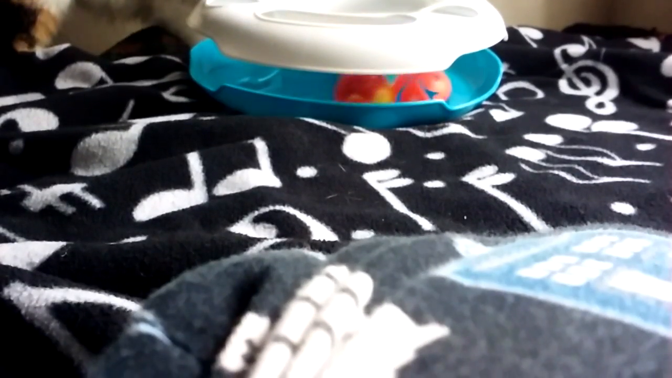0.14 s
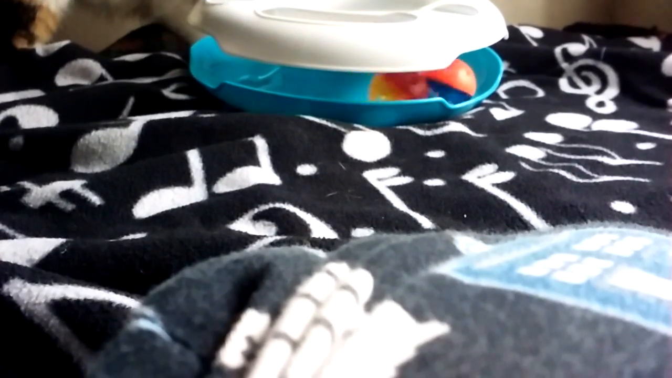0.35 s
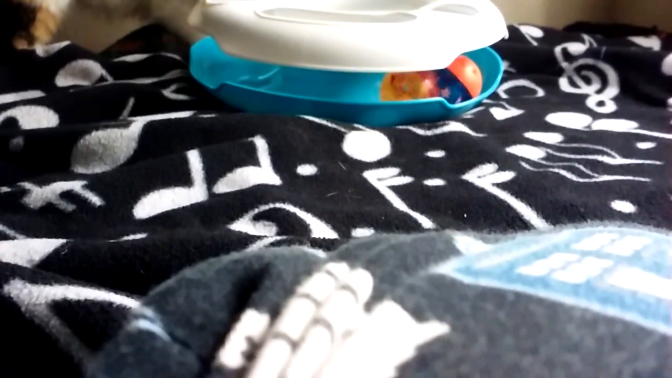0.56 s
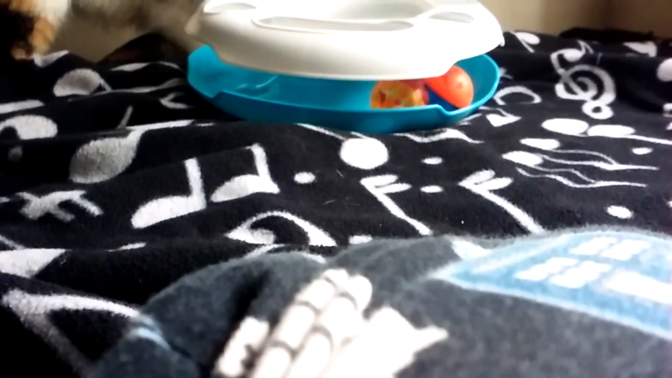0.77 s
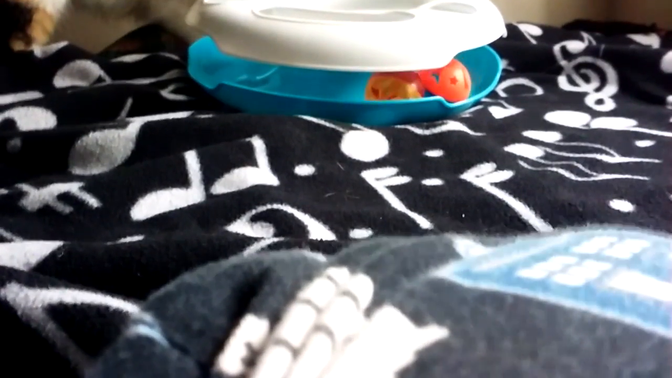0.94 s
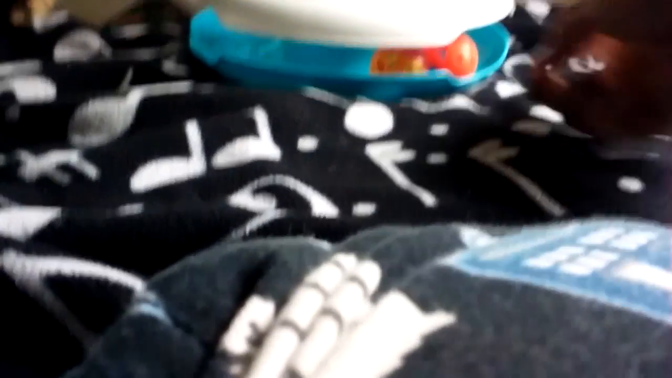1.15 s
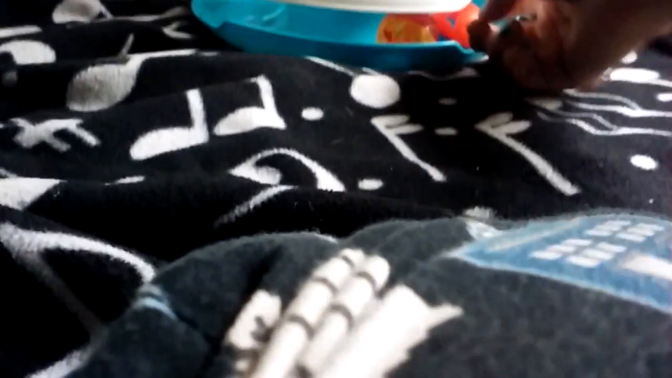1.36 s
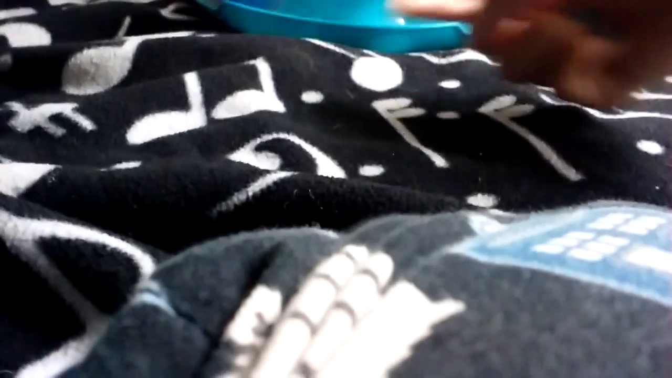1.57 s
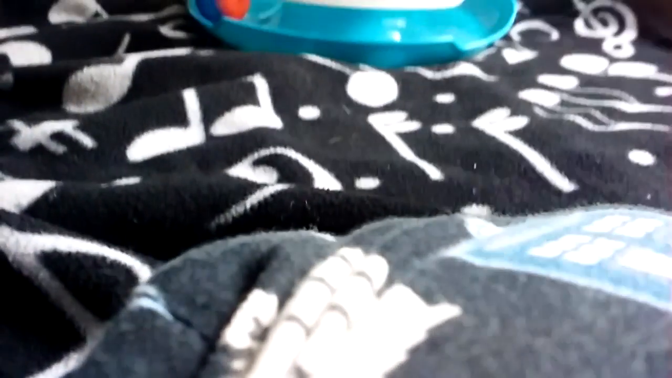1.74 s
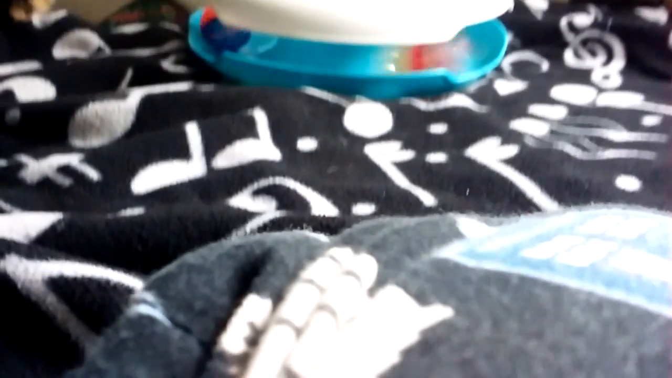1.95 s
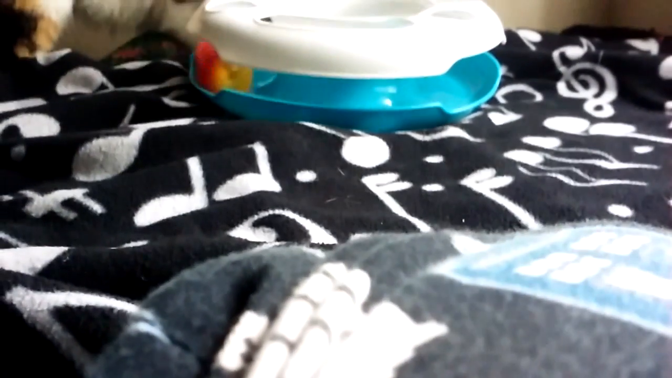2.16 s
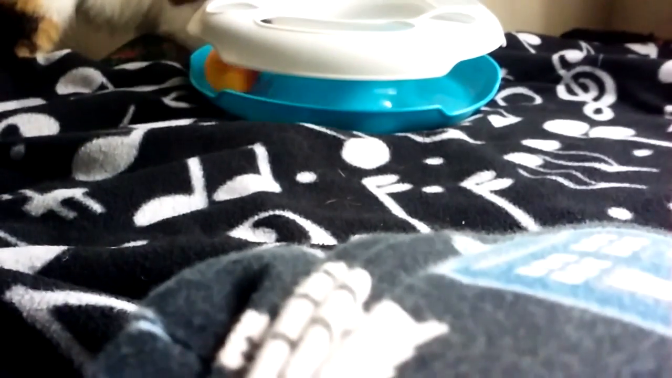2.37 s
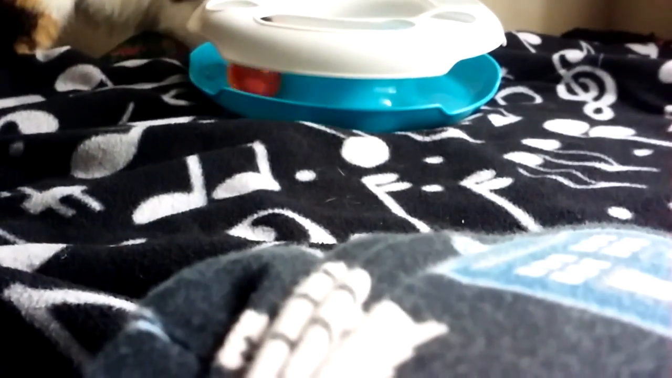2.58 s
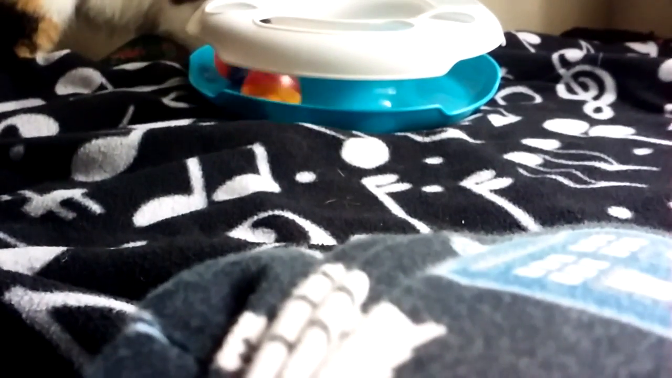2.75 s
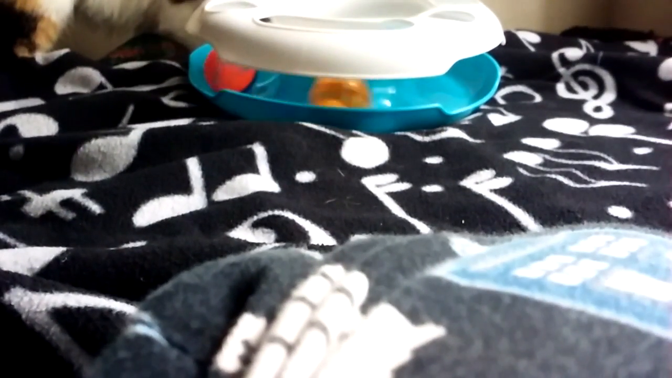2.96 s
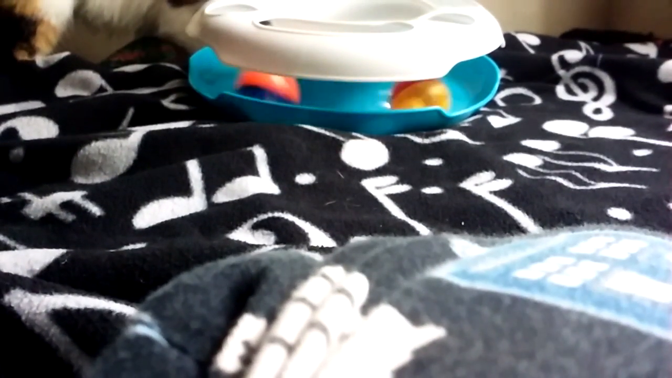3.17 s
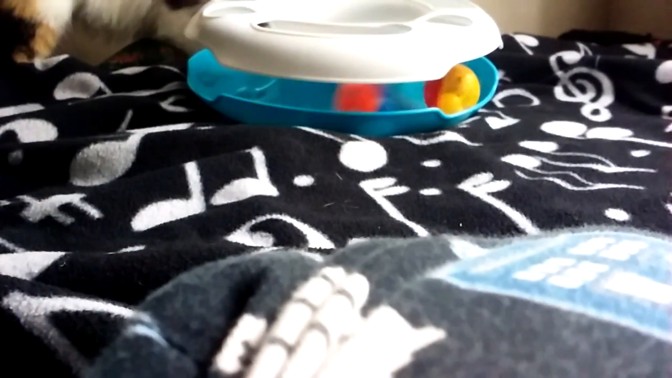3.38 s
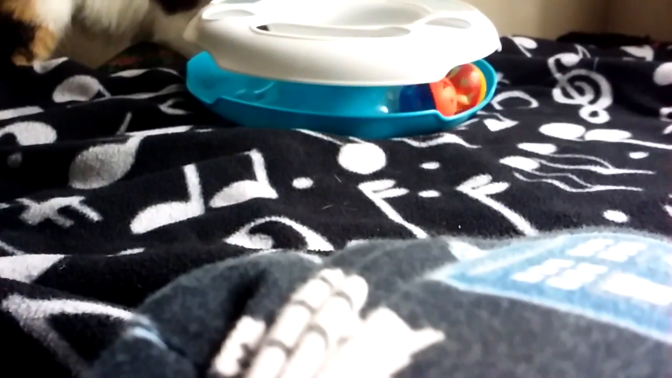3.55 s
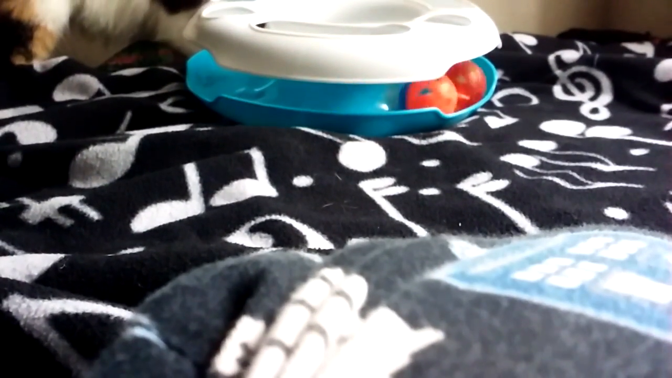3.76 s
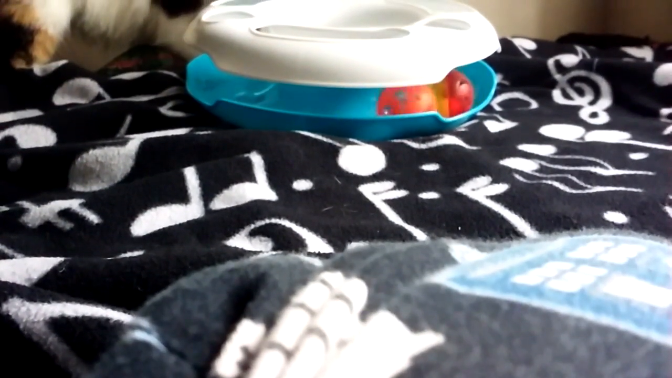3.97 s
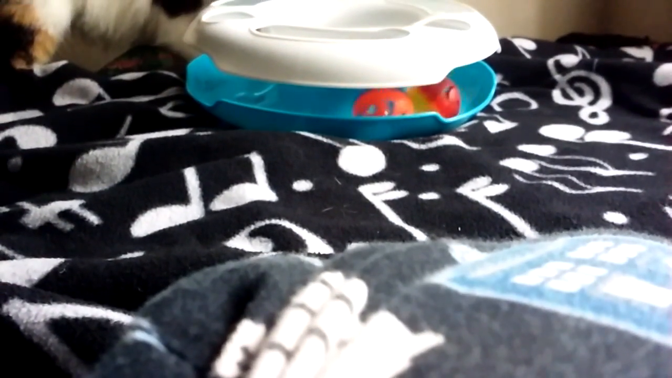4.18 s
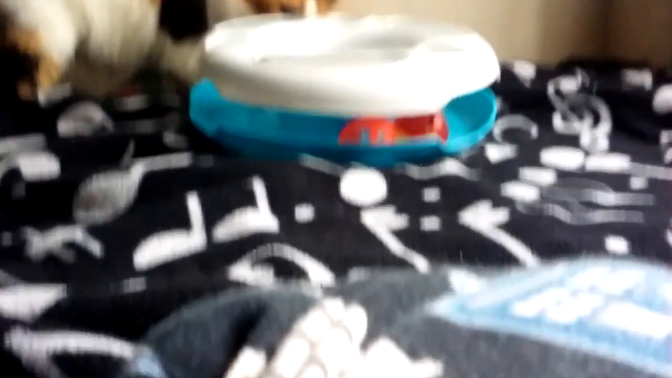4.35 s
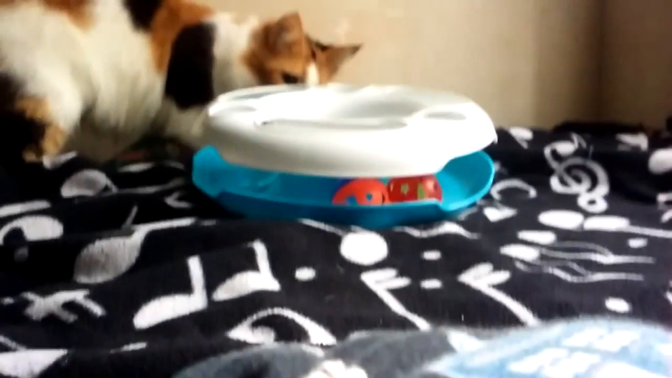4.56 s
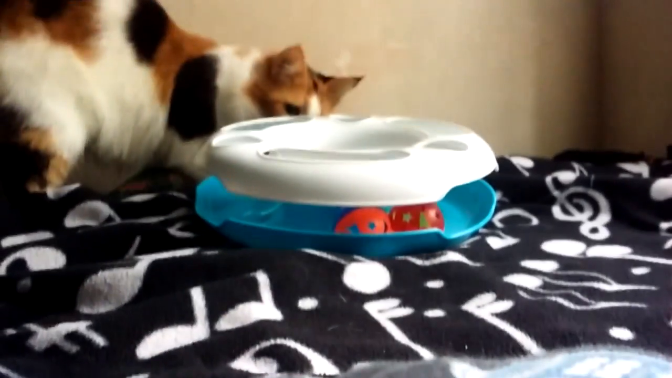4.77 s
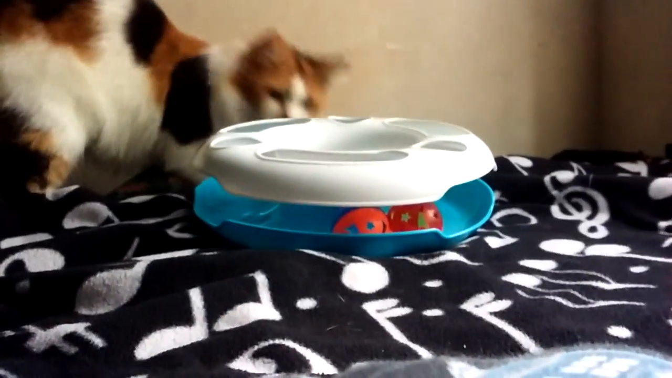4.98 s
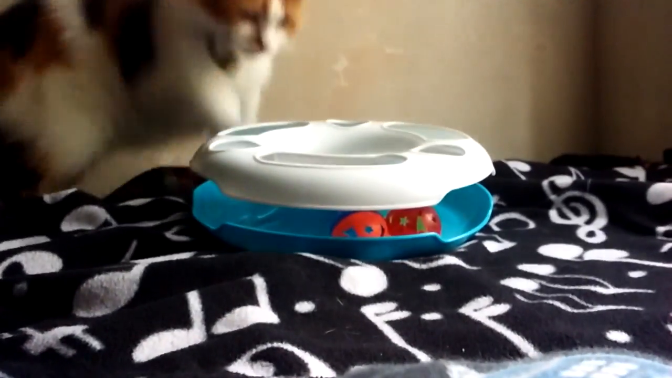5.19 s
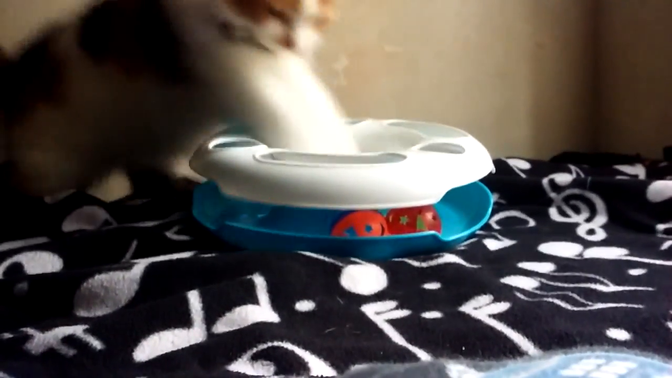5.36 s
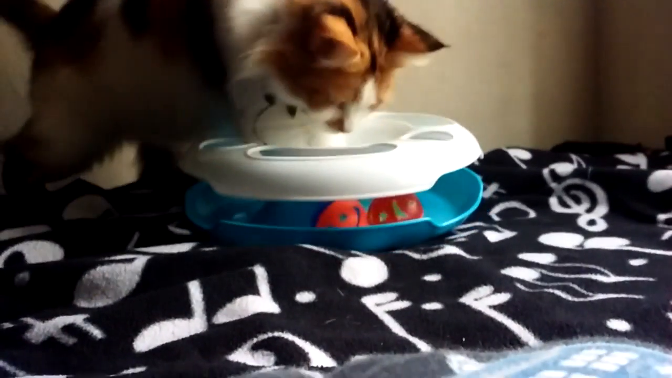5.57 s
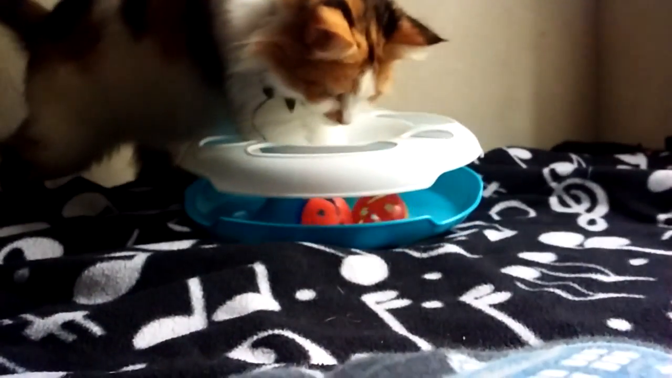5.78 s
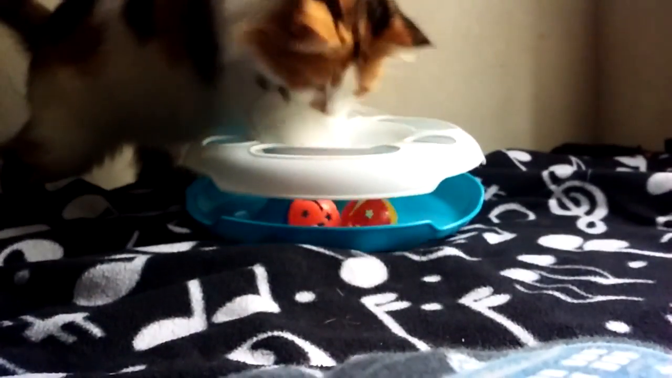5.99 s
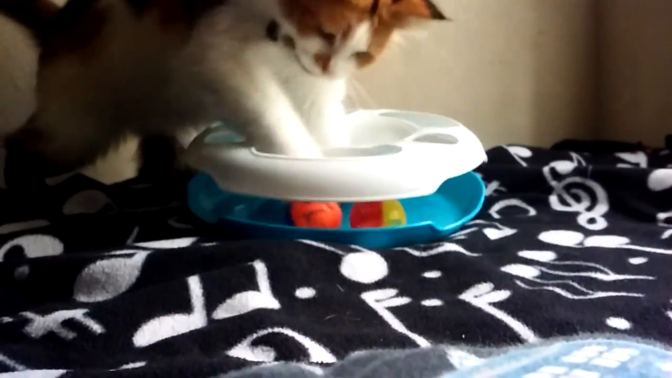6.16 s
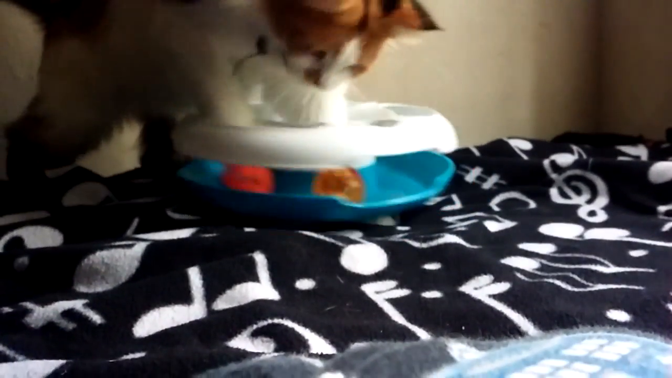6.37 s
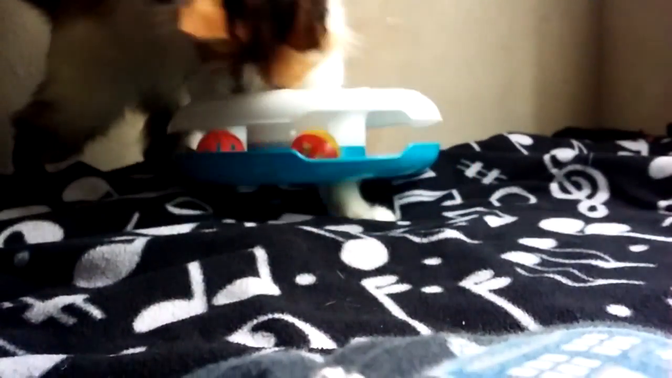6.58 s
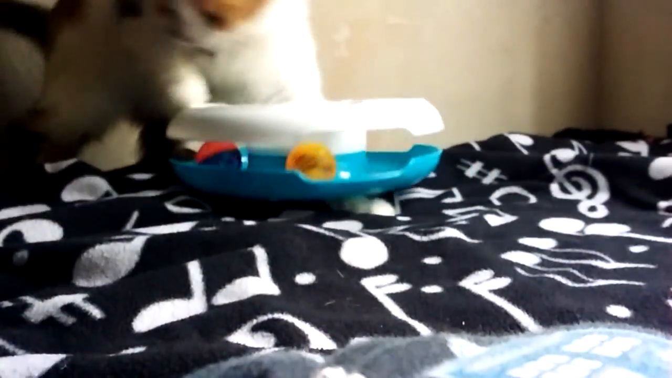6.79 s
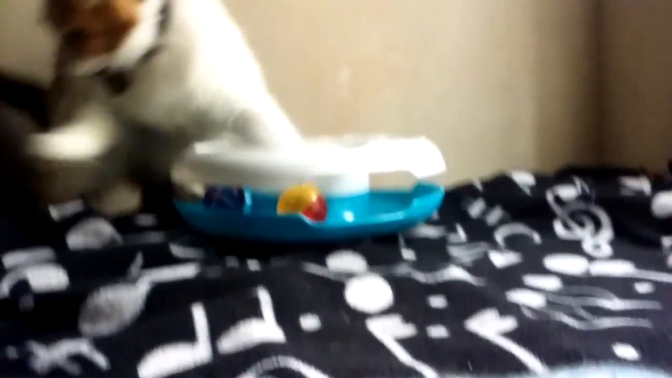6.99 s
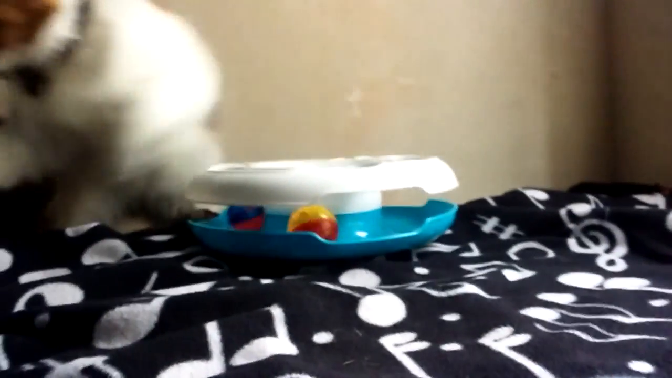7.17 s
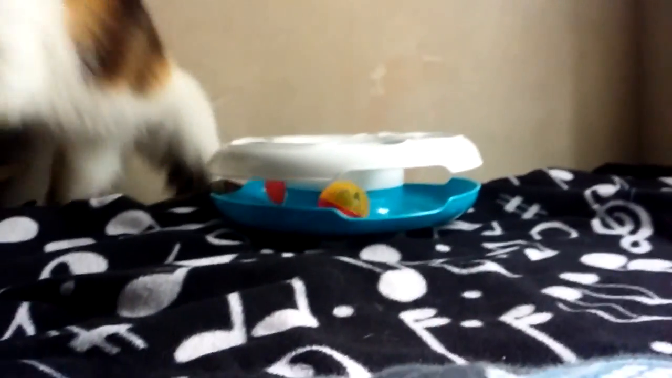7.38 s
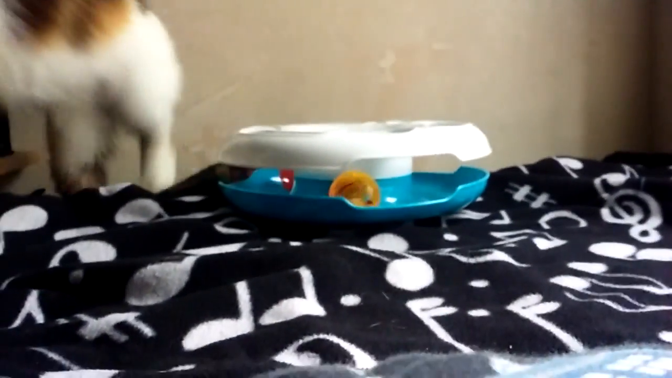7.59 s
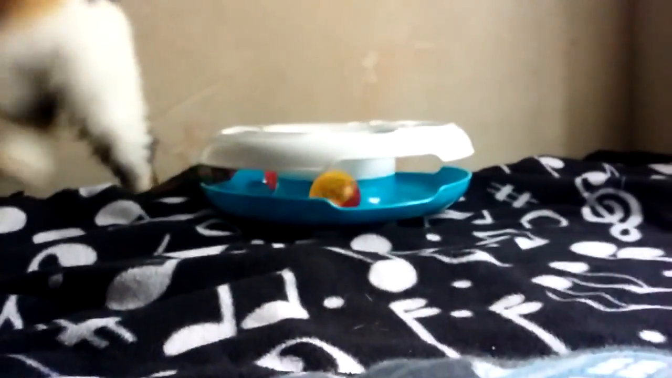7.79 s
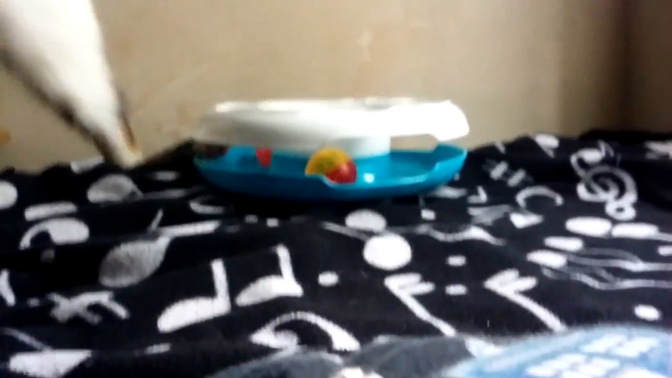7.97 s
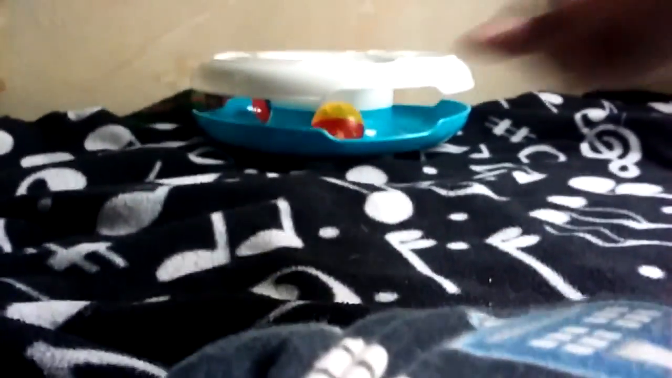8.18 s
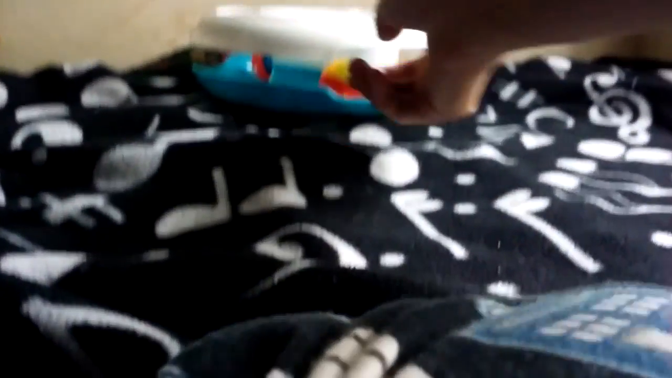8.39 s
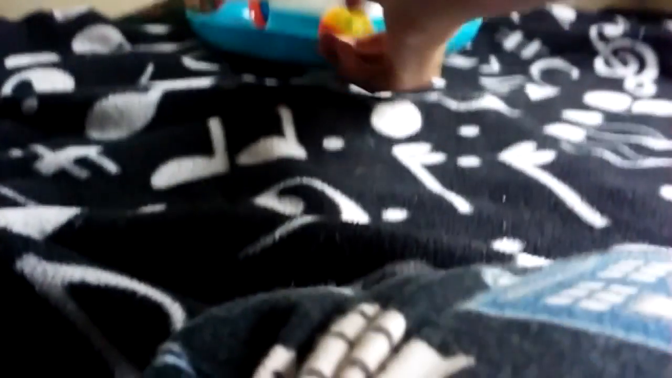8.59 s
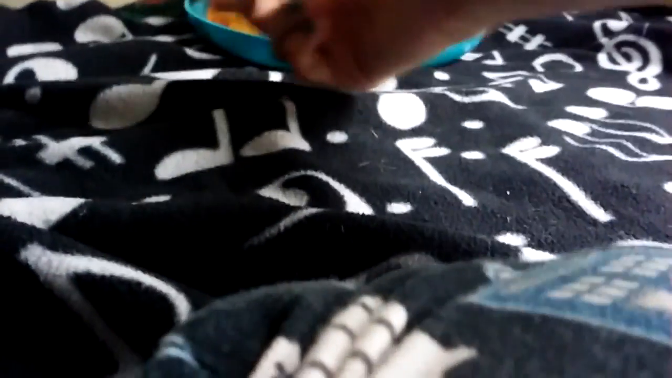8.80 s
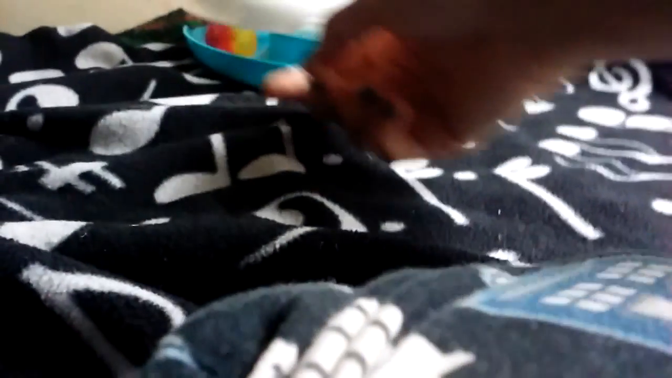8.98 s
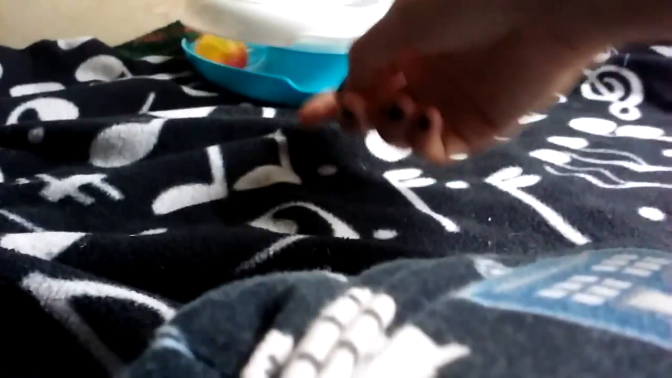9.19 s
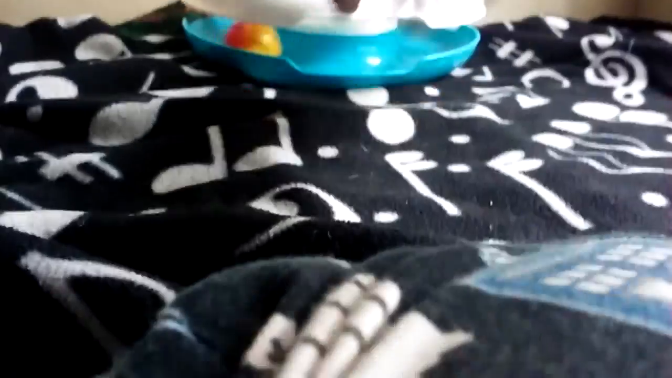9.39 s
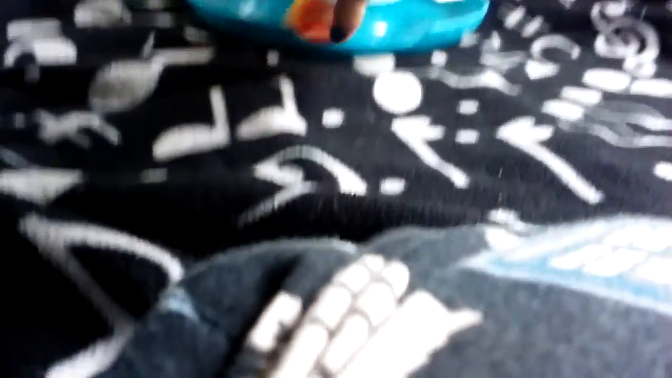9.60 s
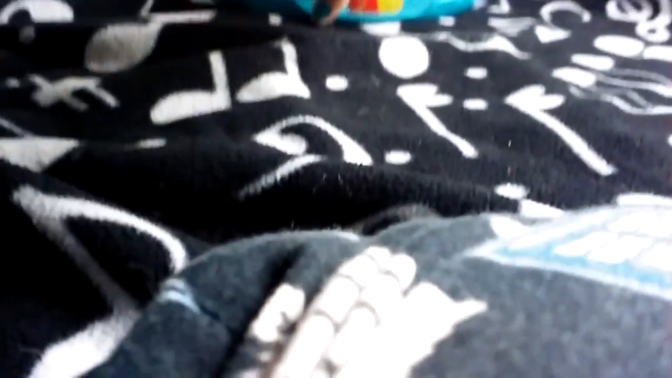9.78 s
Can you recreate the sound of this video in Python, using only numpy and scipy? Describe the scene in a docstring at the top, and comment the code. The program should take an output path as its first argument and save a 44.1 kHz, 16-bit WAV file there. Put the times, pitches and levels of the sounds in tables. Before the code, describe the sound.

Two plastic balls with tinny bells inside jingle and rattle in short bursts around a hollow plastic track, knocking sharply, over a faint pulsing whir.

```python
"""A clack and a jingle open the scene: two plastic balls with bells inside roll round a cat toy's ring track.
A hand and a paw push them, on a bed: pellets strike the bells and scuff the shells (decaying modes and noise
bursts), the balls clack together, knock and patter on the hollow track; the blanket gives soft thumps of noise.
Behind them, in the small room, some appliance whirs about once a second (resonant noise) over a low hum (sines)."""
import sys
import numpy as np
from scipy import signal
from scipy.fft import rfft, irfft, next_fast_len
from scipy.io import wavfile
from scipy.ndimage import uniform_filter1d, map_coordinates

SR = 44100
rng = np.random.default_rng(int(sys.argv[2]) if len(sys.argv) > 2 else 0)


def int16_out(signal):
    """Quantize to a 16-bit WAV file."""
    q = np.round(np.clip(np.atleast_2d(signal).T, -1, 1) * 32767)
    wavfile.write(sys.argv[1], SR, q.astype(np.int16))


N = 433944


def amp(db):
    """Decibels to gain."""
    return 10 ** (np.asarray(db) / 20)


def unit(x):
    """x at rms 1."""
    return x / np.sqrt(np.mean(x ** 2) + 1e-20)


def along(points, hz):
    """(Hz, value) points read on a log frequency axis."""
    f, v = np.transpose(points)
    return np.interp(np.log(hz + 1), np.log(f + 1), v)


def clock():
    """Time of every sample in seconds."""
    return np.arange(N) / SR


def wobble(rate_hz):
    """Smooth random curve, rate_hz knots a second."""
    knots = rng.standard_normal(int(N * rate_hz / SR) + 4)
    return map_coordinates(knots, [clock() * rate_hz])


def filtered(x, response):
    """x times a response of frequency."""
    m = next_fast_len(N + SR // 2)
    hz = np.fft.rfftfreq(m, 1 / SR)
    return irfft(rfft(x, m) * response(hz), m)[:N]


def noise(spectrum):
    """Noise of rms 1 with the given colour."""
    return unit(filtered(rng.standard_normal(N), lambda hz: amp(along(spectrum, hz))))


def pulses(times_s, sizes):
    """One impulse for each contact."""
    return np.bincount(np.clip(times_s * SR, 0, N - 1).astype(int), sizes, N)


def ring(times_s, sizes, modes, scatter_db, detune, contact_s, colour_db=0):
    """Contacts ring the modes; each lands on another spot, which shares out its force and bends the pitches anew."""
    t = np.arange(SR // 18, dtype=np.float32) / SR
    hz, db, t60 = np.transpose(modes)
    draws = rng.standard_normal((len(times_s), 3, len(modes)))
    force, bend, turn = draws.transpose(1, 0, 2)
    shares = amp(db + colour_db + scatter_db * force)
    shares = np.float32(shares / np.linalg.norm(shares, axis=1, keepdims=True))
    speed = np.float32(2 * np.pi * hz * (1 + detune * bend))
    phase = np.float32(2 * np.pi * turn)
    decay = np.float32(amp(-60 * t / t60[:, None]))
    waves = 0
    for k in range(len(modes)):
        waves = waves + shares[:, [k]] * np.sin(speed[:, [k]] * t + phase[:, [k]]) * decay[k]
    swell = 1 - np.exp(-(t / contact_s) ** 2)  # the ring builds up while the contact lasts
    where = (times_s * SR).astype(int)[:, None] + np.arange(len(t))
    return np.bincount(where.ravel(), (sizes[:, None] * swell * waves).ravel(), N)[:N]


# Dry click of a contact. Each row: frequency in Hz, relative spectral level in dB.
CLICK_SPECTRUM = [(100, -58.5), (900, -28), (2600, -13), (3800, -6.5), (4900, -2.5), (6800, -2.5),
                  (8500, -10), (11000, -19.5), (14000, -19.5), (16000, -30)]


def clicks(times_s, sizes, t60_s, colour=CLICK_SPECTRUM, treble_scatter_db=4):
    """Short burst of noise at each contact; how much top it has varies as the balls turn."""
    t = np.arange(SR // 8) / SR
    decay = amp(-60 * t / t60_s) * (1 - np.exp(-t / .0006))
    envelope = signal.oaconvolve(pulses(times_s, sizes), decay)[:N]
    bursts = rng.standard_normal(N) * envelope

    def top_share(hz):
        return np.clip((hz - 9500) / 3000, 0, 1)

    low = filtered(bursts, lambda hz: amp(along(colour, hz)) * (1 - top_share(hz)))
    high = filtered(bursts, lambda hz: amp(along(colour, hz)) * top_share(hz))
    return low + amp(treble_scatter_db * wobble(25)) * high


def chatter(rate_hz, spread_db):
    """Times and sizes of small contacts: one at a random moment in each slot, at a random level."""
    slots = np.arange(int(rate_hz * N / SR))
    draws = rng.random((len(slots), 2))
    return (slots + draws[:, 0]) / rate_hz, amp(-spread_db * draws[:, 1])


def turning(times_s, modes):
    """As a ball turns, successive contacts favour other modes: a slow random weight for each."""
    weights = rng.standard_normal((len(times_s), len(modes)))
    return unit(uniform_filter1d(weights, size=7, axis=0))


# Appliance resonances. Each row: frequency in Hz, half-width at half amplitude in Hz, relative level in dB.
WHIR_RESONANCES = [(353.7, 17.5, 0.5), (706, 13, -12.5), (878.4, 11, 0), (947, 57, -15)]
# Its rush of air. Each row: frequency in Hz, relative spectral level in dB.
AIR_SPECTRUM = [(60, -23), (150, -2), (280, 2.5), (450, -2), (620, -2.5), (1000, -7), (1300, -23),
                (2500, -29.5), (6000, -41), (15000, -45.5)]


def appliance(flutter_hz=46, period_s=.961, first_s=.53):
    """Each slow stroke draws air and sets a fluttering whir going for about half the cycle."""
    t = clock()
    stroke = np.cos(2 * np.pi * (t - first_s) / period_s)
    running = np.clip(.5 + 3.0 * stroke, 0, 1)

    def body(f):
        return sum(amp(db) / (1 + ((f - hz) / width) ** 2) for hz, width, db in WHIR_RESONANCES)

    whir = unit(filtered(rng.standard_normal(N), body))
    flutter = 1 + 0.39 * np.sin(2 * np.pi * flutter_hz * t + 2 * wobble(9))
    air = amp(-63.0 + 0.84 * stroke + wobble(2.3)) * noise(AIR_SPECTRUM)
    return amp(-57.5) * running * flutter * whir + air


# Still room air. Each row: frequency in Hz, relative spectral level in dB.
STILL_SPECTRUM = [(20, -29.5), (40, -18), (60, -14), (90, -10.5), (170, -9), (300, 5.5), (600, -15),
                  (1200, -17.5), (3000, -21), (8000, -24), (15500, -23)]
# Hum partials. Each row: frequency in Hz, rms level in dB about which it wavers.
HUM_PARTIALS = [(59.5, -83), (119.5, -73.5), (177, -71.5)]


def background():
    """Appliance, wavering hum sines and room air with an uneven rumble; their level dips briefly twice."""
    t = clock()
    hum = np.zeros(N)
    for hz, db in HUM_PARTIALS:
        level = amp(db + wobble(4)) * np.sqrt(2)
        hum += level * np.sin(2 * np.pi * hz * t + .5 * wobble(1.6))
    rumble_spectrum = [(20, -12.5), (45, -8), (60, 5), (85, -13), (160, -15.5), (1000, -72.5)]
    rumble = amp(-75.5 + 3.5 * wobble(3.9)) * noise(rumble_spectrum)
    still = amp(-69) * noise(STILL_SPECTRUM)
    dip_times_s = [.84, .94, 1.12, 1.22, 4.72, 4.79, 4.98, 5.08]
    dips_db = np.interp(t, dip_times_s, [0.0, -16.5, -11.5, -2.0, 0, -10.5, -8.5, -0.5])
    return amp(dips_db) * (appliance() + hum + rumble + still)


# Room decay. Each row: frequency in Hz, t60 in seconds.
ROOM_DECAY = [(200, 0.17), (1000, 0.11), (5000, 0.14), (14000, 0.14)]


def room(x):
    """The walls' answer: a noise tail, each frequency dying at its own speed."""
    hz, t, z = signal.stft(rng.standard_normal(SR // 2), SR, nperseg=256)
    decay = amp(-60 * t / along(ROOM_DECAY, hz)[:, None])
    tail = signal.istft(z * decay, SR, nperseg=256)[1]
    tail = np.pad(tail / np.linalg.norm(tail), (SR // 250, 0))  # first echo after 4 ms
    return signal.oaconvolve(x, tail)[:N]


# Soft pushes into the bedding. Each row: centre in seconds, level in dB, Gaussian sigma in seconds, pitch in Hz.
THUMPS = [(1.415, -53, 0.045, 151), (5.298, -55, 0.03, 174), (5.407, -55, 0.038, 175),
          (7.484, -54, 0.023, 193), (9.406, -64, .03, 183)]


def bedding(focus_db=24):
    """Dull thumps as hand and paws press on the bed: swells of noise peaked at the pitch."""
    thumps = np.zeros(N)
    for centre_s, db, sigma_s, pitch in THUMPS:
        colour = [(pitch / 4, -2 * focus_db), (pitch / 2, -focus_db / 2), (pitch, 0),
                  (2 * pitch, -focus_db), (16 * pitch, -4 * focus_db)]
        swell = np.exp(-.5 * ((clock() - centre_s) / sigma_s) ** 2)
        thumps += amp(db) * swell * noise(colour)
    return thumps


# Runs of a ball, push to stop. Each row: start in seconds, length in seconds, jingle in dB before trim,
# track rumble in dB before trim, slowing in dB per second (negative: it gains).
RUNS = [(0.0, 0.29, -37, -57, 5.5), (0.338, 0.27, -41.5, -72, 22), (0.628, 0.2, -55.5, -75, 14),
        (1.575, 0.12, -29.5, -50, -58), (1.756, 0.33, -26, -41.5, 5.5), (2.099, 0.13, -37.5, -46.5, 54),
        (2.26, 0.15, -29, -48, 5), (2.43, 0.62, -48, -67, 21), (2.636, 0.078, -39.5, -69, 1),
        (2.897, 0.26, -36, -56.5, 19), (3.128, 0.22, -33.5, -50, 17), (3.374, 0.31, -36.5, -52, 4),
        (3.68, 0.2, -53, -76, 30), (3.82, 0.35, -59, -77, -2), (4.193, 0.3, -41, -66, 17),
        (4.477, 0.24, -46, -75, 52), (5.68, 0.052, -45.5, -84, 20), (5.815, 0.16, -40.5, -64, 88),
        (6.232, 0.19, -25, -44.5, 52), (6.514, 0.14, -37, -62, 11), (6.693, 0.025, -35.5, -80, 20),
        (6.797, 0.132, -36, -51, 5), (7.034, 0.059, -45.5, -80, 12), (7.263, 0.18, -50.5, -72, 12),
        (7.526, .07, -50.5, -77, 0), (7.655, 0.12, -44, -60, 42), (7.857, 0.18, -63, -84.5, 34),
        (8.418, 0.21, -61.5, -92, 70), (8.769, 0.19, -37.5, -54, 0), (8.934, 0.21, -46, -66, 19),
        (9.194, 0.21, -51.5, -71.5, 21), (9.418, 0.13, -44, -70.5, -27), (9.612, 0.34, -45.5, -67, 35)]
RUN_ATTACK_S, RUN_RELEASE_DB_PER_S = 0.011, 255.5  # getting under way; the pellets settling
LURCH_DB, LURCH_RATE_HZ = 3.5, 22  # a ball rolls unevenly


def rolling():
    """Strengths of jingle and track rumble: a pushed ball gets going, changes level steadily, then stops."""
    t = clock()
    jingle, rumble = np.zeros((2, N))
    for start, length, jingle_db, track_db, slowing in RUNS:
        span = (t > start) & (t < start + length + .5)
        age = t[span] - start
        slowing_db = slowing * np.minimum(age, length)
        release_db = RUN_RELEASE_DB_PER_S * np.maximum(age - length, 0)
        speed = np.minimum(age / RUN_ATTACK_S, 1) * amp(-slowing_db - release_db)
        jingle[span] += amp(jingle_db) * speed
        rumble[span] += amp(track_db) * speed
    lurch = amp(LURCH_DB * wobble(LURCH_RATE_HZ))
    return jingle * lurch, rumble * lurch


# Knocks of balls and paw on the plastic. Each row: time in seconds, level in dB before trim,
# pitch favoured by the spot in Hz.
KNOCKS = [(0.035, -29.5, 974), (0.168, -29, 1230), (1.651, -20.5, 1850), (1.709, -23.5, 1200),
          (1.834, -24.5, 1540), (1.921, -20.5, 1100), (1.98, -27.5, 1100), (2.019, -25.5, 1490),
          (2.111, -28.5, 1390), (2.183, -25, 1160), (2.226, -30, 1120), (2.249, -26.5, 1020),
          (3.005, -28.5, 1870), (3.189, -25.5, 1400), (3.267, -30.5, 1100), (3.423, -32.5, 930),
          (3.594, -37, 800), (3.652, -37, 860), (4.924, -52, 1260), (5.308, -49.5, 3110), (5.966, -37, 940),
          (6.208, -35.5, 850), (6.237, -10.5, 706), (6.243, -11.5, 1030), (6.341, -38.5, 1470),
          (6.373, -35, 1550), (6.626, -34.5, 1710), (6.686, -40, 1690), (6.802, -30, 1520),
          (7.658, -41.5, 1600), (8.774, -34, 2170), (8.838, -32, 1160), (9.018, -38, 850),
          (9.649, -36, 1140), (9.709, -34.5, 1060)]
# Hollow plastic track modes. Each row: nominal frequency in Hz, relative level in dB, t60 in seconds.
TRACK_MODES = [(300, -3, 0.059), (395, -8.5, 0.036), (505, -6.5, 0.012), (689.4, -4, 0.038),
               (895, -1.5, 0.015), (994, -2, 0.031), (1160, -3, 0.037), (1303, -3.5, 0.025),
               (1609, -0.5, 0.027), (1800, -1.5, 0.023), (2000, -20, 0.018), (2510, 5.5, 0.012),
               (2897, -11.5, 0.06)]


def track(roll, focus_db=12, contact_s=.0013):
    """Balls and paw knock on the hollow track, ringing modes near each spot's pitch; ball seams patter along it."""
    s, db, pitch = np.transpose(KNOCKS)
    octaves_off = np.abs(np.log2(np.array(TRACK_MODES)[:, 0] / pitch[:, None]))
    spot_db = -focus_db * np.minimum(octaves_off, 1.4)
    knocks = ring(s, amp(db), TRACK_MODES, scatter_db=-0.5, detune=0.045, contact_s=contact_s, colour_db=spot_db)
    knocks = amp(-3) * knocks + amp(-8.5) * clicks(s, amp(db), t60_s=0.074)
    s, size = chatter(rate_hz=135, spread_db=11.5)
    patter = ring(s, size, TRACK_MODES, scatter_db=5.5, detune=0.057, contact_s=contact_s)
    return knocks + amp(-3.0) * roll * unit(patter)


# Ball on ball. Each row: time in seconds, level in dB before trim.
CLACKS = [(0.027, -23), (0.17, -23), (1.859, -13), (2.276, -17.5), (2.853, -31), (3.551, -21.5),
          (4.925, -55), (5.514, -20), (5.8, -30.5), (5.924, -39), (6.802, -25), (7.173, -28),
          (7.793, -33.5), (8.885, -18.5), (9.688, -30.5)]
REBOUND_S, REBOUND_LOSS_DB = .008, 6  # they touch once more, more lightly
# Dry crack of ball on ball. Each row: frequency in Hz, relative spectral level in dB.
CRACK_SPECTRUM = [(300, -25), (1600, -19), (3200, -9.5), (4300, -6), (5800, 4), (7000, -6.5), (9500, -20.5),
                  (16000, -32.5)]
# Thin ball shell modes, also scuffed from inside. Each row: nominal frequency in Hz, relative level in dB,
# t60 in seconds.
SHELL_MODES = [(3267, -15.5, 0.015), (3860, -6.5, 0.014), (4628, 0, 0.019), (5470, 2.5, 0.016),
               (7180, -6.5, 0.013)]


def clacks():
    """Ball meets ball and rebounds: a dry crack and a brief ring of the shells."""
    s, db = np.transpose(CLACKS)
    s = np.append(s, s + REBOUND_S)
    size = amp(np.append(db, db - REBOUND_LOSS_DB))
    shells = ring(s, size, SHELL_MODES, scatter_db=11.5, detune=0.031, contact_s=0.00018)
    crack = clicks(s, size, t60_s=.03, colour=CRACK_SPECTRUM)
    return amp(-6) * shells + amp(-0.5) * crack


PELLET_GAP_S, PELLET_LOSS_DB = .007, 7.5  # mean gap, loss a bounce


def bouncing(s, db, count=3):
    """A pellet bounces about inside its bell: each strike and its ever lighter bounces, count contacts in all."""
    gaps = PELLET_GAP_S * (.5 + rng.random((len(s), count)))
    times = s[:, None] + np.cumsum(gaps, axis=1) - gaps[:, :1]
    sizes = amp(db[:, None] - PELLET_LOSS_DB * np.arange(count))
    return times.ravel(), sizes.ravel()


# Clearest pellet strikes on the bells. Each row: time in seconds, level in dB before trim,
# side modes' boost against the main note in dB.
STRIKES = [(0.094, -18, 2), (0.193, -19, -2.5), (0.254, -21.5, -8), (0.288, -20, 6), (0.5, -26, 7),
           (1.078, -64.5, 4), (1.595, -14, -3), (1.608, -13.5, -8.5), (1.626, -5.5, -14), (1.65, -4.5, -3),
           (1.668, -4, -8), (1.711, -8.5, 10), (1.757, -11, 10), (1.778, -3, -0.5), (1.89, -11, -7.5),
           (1.939, -9, -6), (1.965, -10, 13), (2.008, -11, -3.5), (2.06, -10.5, 13), (2.075, -7, -1),
           (2.267, -17.5, 2.5), (2.346, -15.5, 1.5), (2.362, -17.5, -12.5), (2.374, -8, -20.5),
           (2.678, -28, 2), (2.802, -34.5, 11), (2.921, -14.5, -8), (2.964, -20, 6), (3.01, -17.5, 4),
           (3.115, -25, -15), (3.141, -25.5, 6), (3.201, -19, 8), (3.246, -26, -20), (3.222, -16.5, -2),
           (3.3, -23.5, 12), (3.394, -25, -3), (3.475, -17, 6), (3.573, -20, 14), (3.653, -18.5, 9),
           (3.75, -30, 3), (3.868, -32.5, 35), (3.959, -38, -6), (4.001, -32, -1), (4.121, -37, -18),
           (4.228, -27.5, -12), (4.455, -28.5, 3), (4.49, -22.5, -6), (4.558, -28, 1), (4.653, -28.5, 4),
           (5.659, -37, 4), (5.708, -30.5, -7), (5.837, -27.5, -18), (6.131, -38, 7), (6.241, -15.5, -4.5),
           (6.258, -10.5, -16), (6.281, -7.5, -14), (6.358, -13, -2), (6.494, -24, 5), (6.54, -19, 5),
           (6.571, -20.5, -12), (6.631, -23.5, -2), (6.654, -21, -3), (6.719, -18, 6.5), (6.812, -18, 2),
           (6.912, -14.5, 1), (7.002, -30, -8), (7.042, -26, -10), (7.08, -17.5, -9), (7.265, -33, 10),
           (7.37, -27.5, 2), (7.675, -32.5, 1), (7.87, -46, 4), (8.45, -43.5, -4), (8.783, -20, 13),
           (8.873, -9.5, 5), (9.058, -15, -2), (9.091, -18, -26), (9.486, -19.5, -5), (9.725, -34.5, -4),
           (9.813, -20, -5)]
# Bell modes. Each row: nominal frequency in Hz, relative level in dB, t60 in seconds.
BELL_MODES = [(3340, -21.5, 0.027), (4259, -23.5, 0.034), (4554, -18.5, 0.043), (4720, -2, 0.013),
              (5079, -6, 0.032), (5194, -0.5, 0.057), (5216, -8, .025), (5602, -9, 0.024),
              (5900, -19, 0.052), (6460, -24, .03), (6750, -9, 0.022), (7514, -21, 0.031),
              (12150, -38, .035), (12600, -35.5, .03), (13450, -33, .02), (14500, -36, .025)]


def bells(jingle, note_hz=5200, note_width_hz=250, turning_db=4, shell_turning_db=7, firm_db=-41,
          soft_contact_s=.0016):
    """Hard pellet strikes stand out of constant tumbling; in a slow ball the pellets mostly scuff the shell."""
    s, db, side_db = np.transpose(STRIKES)
    side_modes = np.abs(np.array(BELL_MODES)[:, 0] - note_hz) > note_width_hz
    s, size = bouncing(s, db)
    side_boost_db = np.repeat(side_db, len(s) // len(db))[:, None] * side_modes
    hard = ring(s, size, BELL_MODES, scatter_db=7.0, detune=.006, contact_s=0.00082, colour_db=side_boost_db)
    hard = amp(-1.32) * hard + amp(-13.0) * clicks(s, size, t60_s=.02)

    s, size = chatter(rate_hz=190, spread_db=25)
    tumble = ring(s, size, BELL_MODES, scatter_db=6, detune=0.0077, contact_s=soft_contact_s,
                  colour_db=turning_db * turning(s, BELL_MODES))
    tumble = unit(tumble) + amp(-9.5) * unit(clicks(s, size, t60_s=0.016))

    s, size = chatter(rate_hz=260, spread_db=7)
    scuff = unit(ring(s, size, SHELL_MODES, scatter_db=7.0, detune=.06, contact_s=soft_contact_s,
                      colour_db=shell_turning_db * turning(s, SHELL_MODES)))
    scuff_share = np.clip(0.063 + 0.6 / (1 + jingle / amp(firm_db)), 0, 1)
    rolling_bells = np.sqrt(1 - scuff_share) * tumble + np.sqrt(scuff_share) * scuff
    return hard + amp(-5.0) * jingle * rolling_bells


def scene(bass_hz=190):
    """The toy in the room; the echo pattern shifts as the balls travel round."""
    jingle, roll = rolling()
    toy = bells(jingle) + clacks() + track(roll)
    # so small a body radiates little bass
    toy = signal.sosfilt(signal.butter(2, bass_hz, "high", fs=SR, output="sos"), toy)
    angle = 2 * wobble(3)
    echo = np.cos(angle) * room(toy) + np.sin(angle) * room(toy)
    return (toy + amp(-6.0) * echo + bedding() + background())[None]


def record(dry, top_hz=15780):
    """Nothing passes at or above the band limit."""
    return filtered(dry[0], lambda hz: hz < top_hz)[None]


dry = scene()
out = record(dry)
int16_out(out)
```